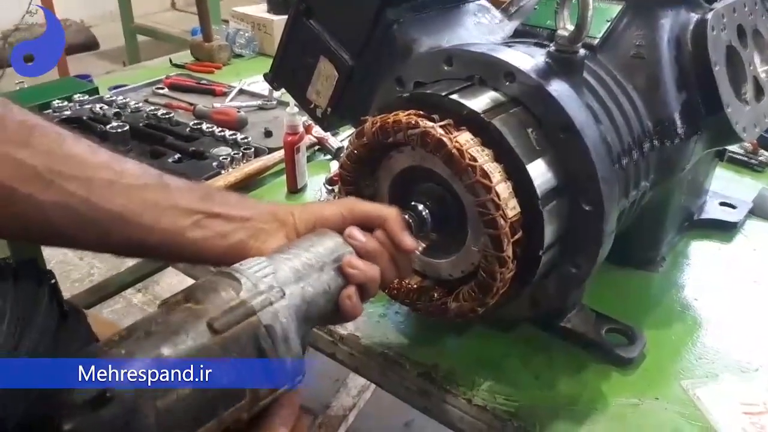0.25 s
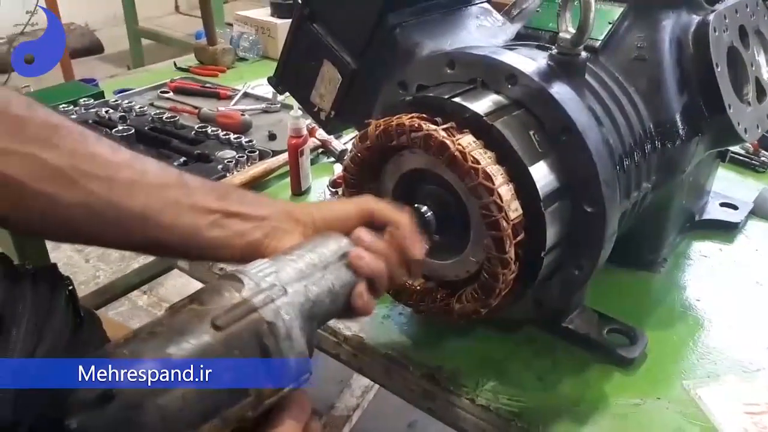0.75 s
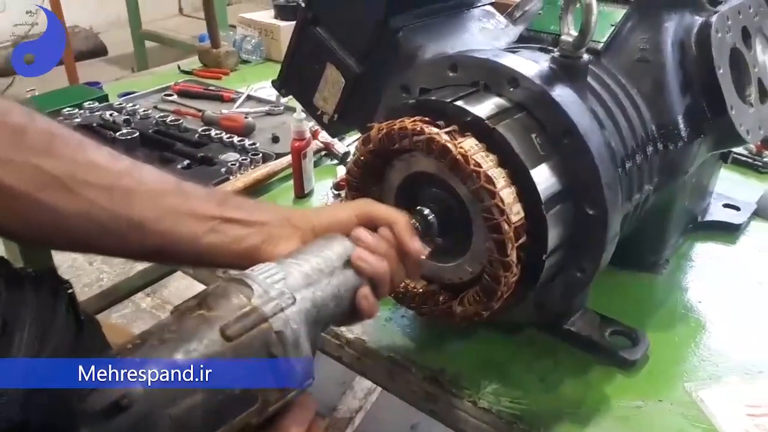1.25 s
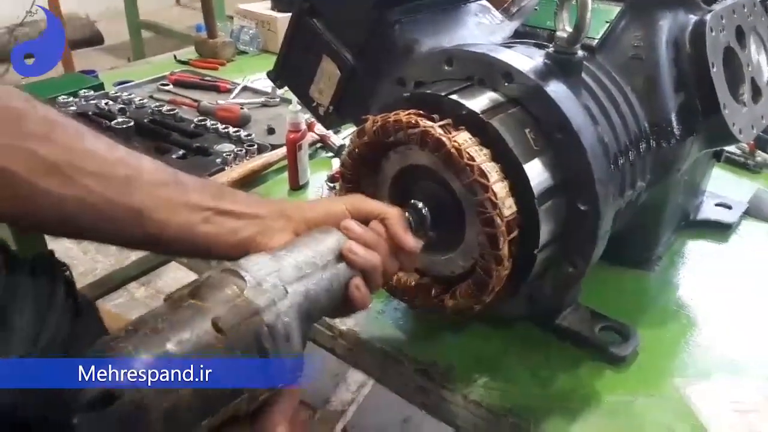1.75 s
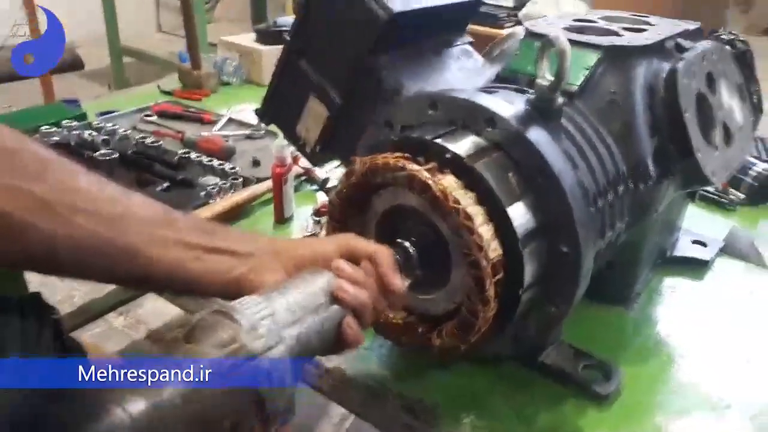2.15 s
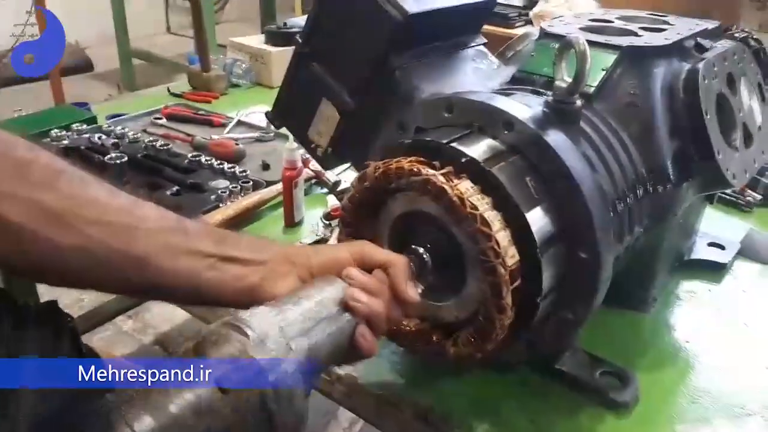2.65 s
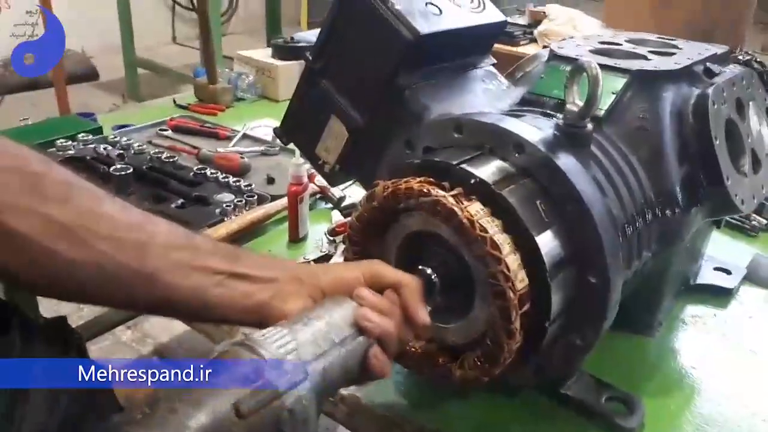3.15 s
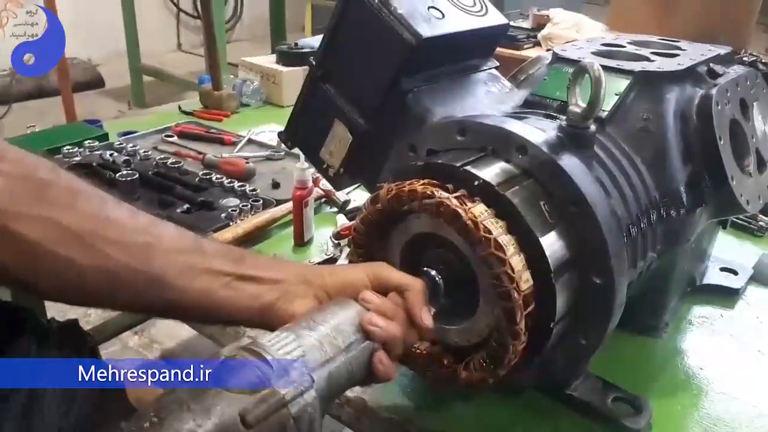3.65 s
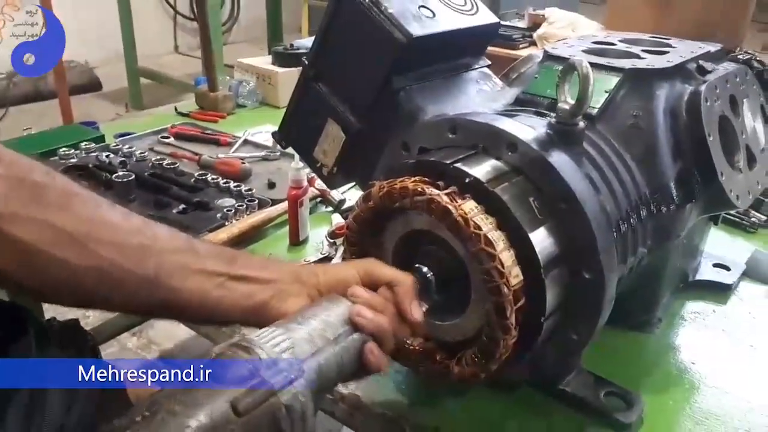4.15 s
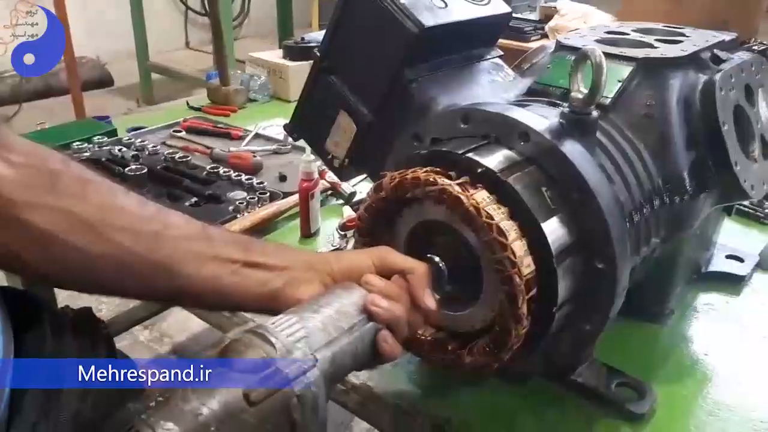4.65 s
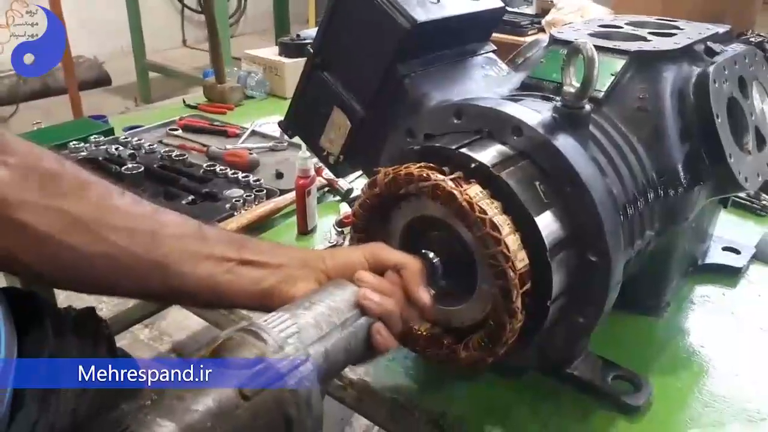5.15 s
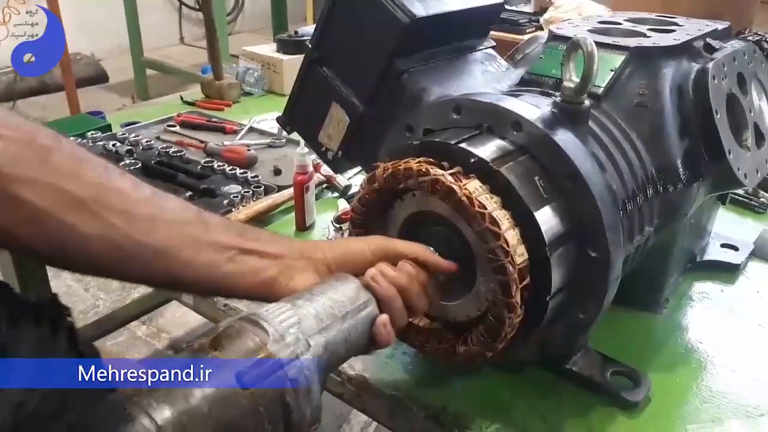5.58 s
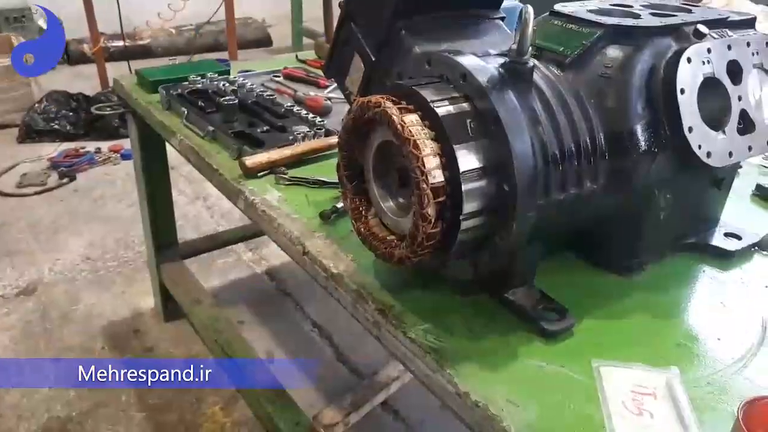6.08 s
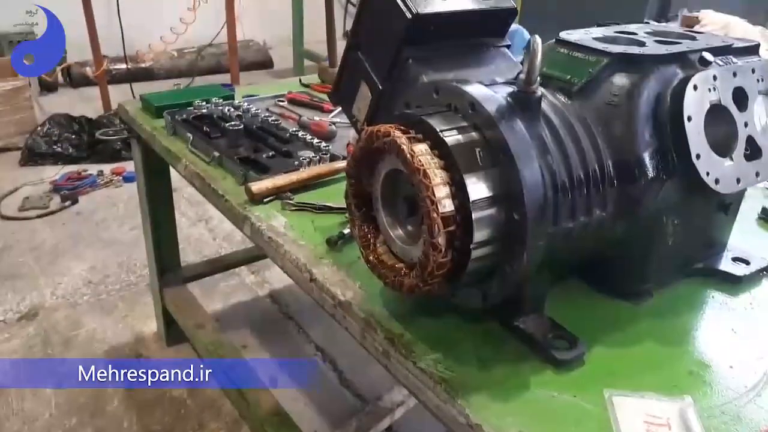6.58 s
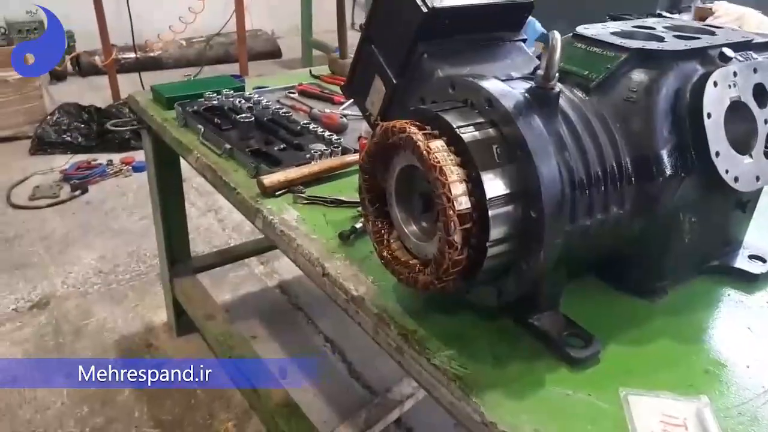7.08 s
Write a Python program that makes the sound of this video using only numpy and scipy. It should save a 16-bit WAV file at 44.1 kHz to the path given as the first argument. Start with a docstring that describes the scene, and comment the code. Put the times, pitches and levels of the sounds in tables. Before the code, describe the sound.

Loud, dry, slightly overloaded hammering of steel on steel: a long burst, then four shorter ones, each speeding up, rattling evenly, then stumbling into single clanks as the motor coasts down. Short workshop reverberation and a weak hum surround it. Then a hard cut to another microphone spot: a steady low compressor drone nearby on the right, handling thumps, a faint brief swish and a small metal tool clinking.

```python
"""An electric impact wrench tightens a bolt in five bursts: a train of noise cracks, rattling pings and thuds,
up to some forty blows a second, over a filtered-noise whirr of gears, with a short workshop reverberation.
Across the workshop a compressor drones: coloured noise with wavering pump harmonics.
After a cut to a second microphone position the wrench is gone and the drone is near, on the right;
the microphone is bumped, small tools clink on the bench and a short swish passes."""
import sys
import numpy as np
from scipy import signal
from scipy.fft import rfft, irfft, next_fast_len
from scipy.io import wavfile
from scipy.ndimage import map_coordinates

SR = 44100
rng = np.random.default_rng(int(sys.argv[2]) if len(sys.argv) > 2 else 0)


def put_to_file(sound):
    """Save the sound as 16-bit audio at rate SR, in the file named by the first command-line argument."""
    columns = np.atleast_2d(sound).T  # one column per channel
    safe = np.clip(columns, -1, 1)
    whole_steps = np.round(safe * 32767)
    wavfile.write(sys.argv[1], SR, whole_steps.astype(np.int16))


N = 322802
T = np.arange(N) / SR
CUT_S = 5.71  # cut from the wrench position to the second microphone position

# Colour of steel on steel: hz, level_db (relative, per Hz)
STRIKE_COLOUR = [(200, -8), (500, -18), (1200, 11), (2500, 14), (5000, 12.5), (9000, 10), (13000, 1.5),
                 (16000, -5.5)]
# Sharp ticks of the socket: hz, level_db (relative, per Hz)
TICK_COLOUR = [(5000, -52), (8000, -4), (11000, -3.5), (16000, 1)]
# Whirr of the gears: hz, level_db (relative, per Hz)
GEAR_COLOUR = [(200, -47), (600, -18.5), (1500, -1.5), (3000, 5), (6000, -2.5), (10000, -1.5),
               (16000, -19.5)]
# Housing tones, high then low: centre_hz, width_hz
HOUSING_TONES = [(4980, 1400), (1643, 100)]
# Trigger pulls, and how the hand damps and aims the tool: on_s, off_s, then relative levels
# whirr_db, high_tone_db, low_tone_db, left_right_db, bench_knock_db, jolt_db
TRIGGER_PULLS = [(0, 0.036, -30, -2, -13, 0, 19, 41.5), (0.19, 1.31, -27, -5, -14, 1, 23, 39.5),
                 (1.755, 2.223, -28.5, -1.5, -14, 2, 24, 41.5), (2.651, 3.258, -30, -48, -7.5, 4, 19, 41),
                 (3.807, 4.414, -31.5, -18, -6, 2.5, 21.5, 41.5),
                 (4.899, 5.492, -25, -11.5, -16.5, 2, 21.5, 41)]
# Time constants of the motor: run_up_s, coast_down_s
MOTOR_SPIN = (0.011, 0.073)


def wrench():
    """Blows excite noise bursts, loose pings and bench thuds; motor speed and cam scrapes drive gear noise."""
    s, blow_db, thud_db = contacts().T
    s = np.round(s * SR) / SR
    on, off, *grip = np.transpose(TRIGGER_PULLS)
    middle = (on + off) / 2
    whirr_db, high_db, low_db, pan_db, knock_db, jolt_db = (np.interp(T, middle, c) for c in grip)
    spin = motor_spin(on, off)
    whirr = amp(whirr_db) * spin

    crack = dying(s, amp(blow_db - 1), 0.015, 0.00049)
    clang = dying(s, amp(blow_db - 5.5), 0.024, 0.0015)
    second_lug = dying(s + 0.0029, amp(blow_db - 11), 0.013, 0.002)  # lands a moment later
    steel = (crack + clang + second_lug) * noise(STRIKE_COLOUR, [(300, 0.047)])

    loose = chatter(s, blow_db, within=0.004, t60=0.02, rise=0.001)
    ticks = (crack + loose) * amp(3.5) * noise(TICK_COLOUR, [(300, 0.13)])
    pings = rattle(s, blow_db - 14.5, within=0.022, detune=0.18, count=20)
    at = np.round(s * SR).astype(int)
    bench_thuds = thuds(s, blow_db + knock_db[at], thud_db + jolt_db[at], thud_db + 30.0)

    # the hammer scrapes up its cam before the next blow
    climb = spin * dying(s + 0.0174, amp(blow_db - 8), 0.022, 0.0018)
    gears = (whirr + climb) * noise(GEAR_COLOUR, [(300, 0)])
    high, low = (unit(filtered(rng.standard_normal((2, N)), resonant([(hz, width_hz, 0)])))
                 for hz, width_hz in HOUSING_TONES)
    housing = (clang + 2 * whirr) * amp(high_db + [[-4], [3]]) * high  # stronger on the right
    housing = housing + (0.33 * clang + 2.7 * whirr) * amp(low_db) * low
    return panned(steel + ticks + pings + bench_thuds + gears + housing, pan_db)


def motor_spin(on, off):
    """The motor swells exponentially up to each pull and coasts down exponentially after it."""
    run_up_s, coast_s = MOTOR_SPIN
    spin = 0
    for a, b in zip(on, off):
        run_up = np.exp(-np.abs(a - T) / run_up_s)
        coast = np.exp(-np.clip(T - b, 0, None) / coast_s)
        spin = spin + np.where(T < a, run_up, coast)
    return spin


# Hammer speed through each burst, one list a burst: time_s, blows_per_s
BURSTS = [
    [(.1979, 27.09), (.313, 35.55), (.44, 39.49), (.76, 39.81), (.96, 40.28), (1.139, 39.82),
     (1.222, 30.64), (1.3392, 19.96)],
    [(1.7342, 23.68), (1.812, 31.58), (1.975, 39.91), (2.059, 36.67), (2.21, 23.68), (2.2785, 14.56)],
    [(2.6765, 24.97), (2.76, 32.46), (2.857, 38.83), (3.088, 39.46), (3.143, 28.72), (3.274, 21.98)],
    [(3.8198, 24.96), (3.892, 33.83), (4.06, 39.39), (4.225, 37.21), (4.237, 26.87), (4.3543, 26.53)],
    [(4.9119, 24.22), (5.004, 34.72), (5.18, 39.26), (5.289, 37.64), (5.343, 29.29), (5.458, 20.51)],
]
# What the speed does to each cycle: blows_per_s, blow_db, thud_db, catch_lead_s, catch_db, rebound_db
CYCLE_BY_SPEED = [(17.96, -9.5, -32, .0142, -7, -24), (27.06, -7.5, -20, .0112, -10, -18),
                  (33.03, -7, -20.5, .0095, -10.5, -42), (39.96, -6, -17, .006, -16.5, -34)]
# Scatter from cycle to cycle: blow_db, thud_db, catch_db, rebound_db
CYCLE_SCATTER = (0.92, 4.2, 3.1, 5.2)
# Single contacts as the hammer creeps round before and after a burst: start_s, clang_db, thud_db
CREEP_CONTACTS = [(.01, -9.5, -32), (0.0266, -9, -15.5), (0.045, -21, -40), (0.0638, -16.5, -44),
                  (0.1177, -9.5, -17.5), (.126, -18, -39), (0.1475, -10, -39), (.1606, -15.5, -35),
                  (0.1832, -9, -30), (1.374, -8, -24), (1.3887, -8.5, -27), (1.413, -11, -43),
                  (1.4448, -7, -25), (1.461, -10.5, -34), (1.485, -14, -45), (1.7165, -10.5, -27),
                  (2.301, -16.5, -38), (2.343, -8, -20), (2.3619, -11, -38), (2.39, -18.5, -28),
                  (2.455, -19, -34), (2.4657, -10.5, -39), (2.508, -14, -44), (2.646, -27, -47),
                  (2.6646, -23, -22), (3.317, -9, -35), (3.332, -10, -22), (3.3453, -8.5, -43),
                  (3.41, -7.5, -39), (3.434, -11.5, -43), (3.743, -28, -45), (3.767, -20.5, -38),
                  (3.7907, -19.5, -44), (4.3672, -14, -33), (4.3898, -6.5, -17.5), (4.406, -10, -37),
                  (4.423, -13, -46), (4.4722, -7, -23), (4.4931, -7.5, -42), (4.534, -24, -36),
                  (4.572, -18, -47), (4.589, -10, -40), (4.627, -13, -37), (4.8736, -27, -39),
                  (5.4693, -13, -43), (5.499, -15, -40), (5.515, -11, -50), (5.5331, -12.5, -40),
                  (5.5877, -5.5, -19), (5.61, -10.5, -31)]
REBOUND_S, JITTER_S = .013, .0006  # rebound after its blow; timing scatter of each blow
SOFT_THUD_DB = -20  # thud of a catch or rebound, under its own clang


def contacts():
    """Once a cycle the hammer catches the anvil, strikes and rebounds; the catch before a burst's first blow is
    among the single contacts."""
    rows = [np.array(CREEP_CONTACTS)]
    speeds, *laws = np.transpose(CYCLE_BY_SPEED)
    for burst in BURSTS:
        knots, rates = np.transpose(burst)
        t = np.arange(knots[0], knots[-1], 1 / SR)
        cycles = np.cumsum(np.interp(t, knots, rates)) / SR
        s = np.interp(np.arange(int(cycles[-1]) + 1), cycles, t)  # one blow at each whole cycle
        speed = np.interp(s, knots, rates)
        blow_db, thud_db, lead, catch_db, rebound_db = (np.interp(speed, speeds, c) for c in laws)
        jitter, *draw = rng.standard_normal((len(s), 5)).T
        scatter = np.array(CYCLE_SCATTER)[:, None] * np.clip(draw, -2, 1.5)
        levels = np.array([blow_db, thud_db, catch_db, rebound_db]) + scatter
        blow_db, thud_db, catch_db, rebound_db = levels
        s = s + JITTER_S * jitter
        blows = np.transpose([s, blow_db, thud_db])
        catches = np.transpose([s - lead, catch_db, catch_db + SOFT_THUD_DB])[1:]
        rebounds = np.transpose([s + REBOUND_S, rebound_db, rebound_db + SOFT_THUD_DB])
        rows += [blows, catches, rebounds]
    return np.vstack(rows)


def chatter(s, db, within, t60, rise):
    """The loose socket strikes three more times soon after each contact."""
    draw = rng.random((len(s), 2, 3))
    times = s[:, None] + 0.0013 + within * draw[:, 0]
    return dying(times, amp(db[:, None] - 40.5 * draw[:, 1]), t60, rise)


# Ringing of anvil, socket and bolt: mode_hz (before detuning), level_db (relative), t60_s
STEEL_MODES = [(1255, 0.5, 0.012), (1637, 2.5, 0.0096), (2520, 8, 0.0081), (2890, 9, 0.0078),
               (4300, 8, 0.0094), (5000, 8, 0.0029), (7180, 7, 0.006), (12920, 12.5, 0.018)]


def rattle(s, db, within, detune, count):
    """Loose steel pings after each contact: short decaying sines near the modes, drawn anew for each side."""
    t, out = T[:260], []
    starts, base_db = np.repeat(s, count)[:, None], np.repeat(db, count)[:, None]
    for draw in rng.random((2, len(s), count, 4)):
        mode = (draw[..., 0] * len(STEEL_MODES)).astype(int)
        hz, mode_db, t60 = np.array(STEEL_MODES)[mode].reshape(-1, 3).T[..., None]
        lag, pitch, size = (draw[..., k].reshape(-1, 1) for k in (1, 2, 3))
        late_db = (8 + 6 * (hz > 9000)) * lag  # late pings are weaker, the highest most of all
        level_db = base_db + mode_db - 3.9 * np.log(size + 0.038) - late_db
        ping_hz = hz * (1 + detune * (2 * pitch - 1))
        pings = amp(level_db - 60 * t / t60) * np.sin(2 * np.pi * ping_hz * t)
        out.append(train(starts + np.round(within * lag * SR) / SR + t, pings))
    return np.array(out)


# Knocks through the bench: centre_hz, width_hz, level_db (relative)
BENCH_KNOCKS = [(318, 960, 7.5), (810, 2860, 7)]
# The machine jolts forward: centre_hz, width_hz, level_db (relative)
FORWARD_JOLT = [(110, 142, 0.012)]
# The machine jolts sideways: centre_hz, width_hz, level_db (relative)
SIDEWAYS_JOLT = [(333, 450, 0)]


def thuds(s, knock_db, jolt_db, shake_db):
    """A push a moment late on each side, a shake of opposite sign, and stray knocks of either sign."""
    draw = rng.random((2, len(s), 3, 2))
    push = [train(s + 0.00374 * side[:, 2, 0], amp(jolt_db)) for side in draw]
    shake = train(s, amp(shake_db)) * [[-1], [1]]
    knocks = []
    for side in draw:
        times = s[:, None] + 0.00691 * side[:, :2, 0]
        signed = 2 * side[:, :2, 1] - 1
        knocks.append(train(times, amp(knock_db)[:, None] * signed))
    pushed = filtered(np.array(push), resonant(FORWARD_JOLT))
    shaken = filtered(shake, resonant(SIDEWAYS_JOLT))
    return pushed + shaken + filtered(np.array(knocks), resonant(BENCH_KNOCKS))


# Reverberation of the workshop: hz, t60_s
SHOP_DECAY = [(150, 0.19), (2000, 0.58), (6000, 0.46), (14000, 0.2)]


def shop(x):
    """Noise whose bands each die at their own speed answers the sound, as the workshop does."""
    hz, t, z = signal.stft(rng.standard_normal((2, SR // 2)), SR, nperseg=256)
    fade = amp(-60 * t / along(SHOP_DECAY, hz)[:, None])
    tail = signal.istft(z * fade, SR, nperseg=256)[1]
    return signal.fftconvolve(x, tail / np.linalg.norm(tail[0]), axes=1)[:, :N]


# Handling of the microphone: start_s, level_db (relative)
MIC_BUMPS = [(5.713, 4.5), (5.727, 3), (7.252, 5), (7.283, 2.5)]
# Small tools on the bench: start_s, level_db (relative)
TOOL_CLINKS = [(6.6278, -22), (7.2382, -21)]
# Ringing of a small tool: mode_hz, level_db (relative), t60_s
TOOL_MODES = [(3490, 4.5, 0.074), (4620, -10, .04), (5700, -5, .14), (6600, -10, 0.11), (7460, -9, 0.12),
              (7440, -5, 0.16), (9851, -1, .04), (10900, -12, .08)]
# A short high swish: centre_s, half_length_s, level_db (relative)
HIGH_SWISH = (6.745, .025, -39)


def bench():
    """Low noise bumps, noise ticks with one ringing clink, and a swelling noise swish, all to the right."""
    s, db = np.transpose(MIC_BUMPS)
    bump_colour = [(45, -26), (90, 16), (250, 9), (600, -1.5), (2000, -47)]
    bumps = dying(s, amp(db - 9), 0.091, 0.0056) * noise(bump_colour, [(40, 0), (150, 0.29)])
    s, db = np.transpose(TOOL_CLINKS)
    tick_colour = [(1500, -40), (4000, 1), (15000, -7)]
    ticks = dying(s, amp(db - 8), 0.041, .0003) * noise(tick_colour, [(100, .2)])
    clinks = amp(-5) * ringing(TOOL_CLINKS[1:], TOOL_MODES, scatter_db=1)  # only the second contact rings
    s, half, db = HIGH_SWISH
    swish_colour = [(3000, -20), (9000, -8), (12000, 1), (15000, -10)]
    swish = amp(db) * np.exp(-((T - s) / half) ** 2) * noise(swish_colour, [(100, 0)])
    return panned(bumps + ticks + clinks + swish, -11)


# Loudness and place of the drone, far then near: time_s, level_db (relative), left_right_db (negative: right)
DRONE_PATH = [(0, -45.5, -23.5), (1.6, -33.5, -5.5), (2.6, -35, -5), (3.6, -35, -5), (4.75, -35, -5.5),
              (5.7, -35.5, -8), (5.712, -22.5, -8), (5.9, -21, -6.5), (6.9, -21, -7), (7.32, -21, -7.5)]
# Air noise from across the workshop: hz, level_db (relative, per Hz)
FAR_COLOUR = [(20, -34), (60, -8), (190, -10), (350, -5), (530, -14.5), (1200, -11.5), (3000, -18.5),
              (6000, -24.5), (16000, -41)]
# Air noise from close by: hz, level_db (relative, per Hz)
NEAR_COLOUR = [(20, -15), (60, -4), (160, -1.5), (350, -0.5), (560, -7.5), (910, -13), (1440, -7.5),
               (2280, -16.5), (4600, -27), (9000, -35), (16000, -41.5)]
# Left-right likeness of the air noise: hz, correlation
AIR_LIKENESS = [(50, -1.24), (130, 1), (290, 0.76), (640, 0.57), (1400, -0.29), (4000, -0.04)]
# Pump harmonics: multiple of PUMP_HZ, level_db (relative)
PUMP_ORDERS = [(2, -9.5), (3, -7.5), (4, -8.5), (6, -20), (7, -21.5)]
PUMP_HZ = 87.9


def compressor():
    """Flickering air noise plus pump harmonics that waver in level and phase; the colour differs far and near."""
    level_db, pan_db = curves(DRONE_PATH)
    far = T < CUT_S
    air = np.where(far, noise(FAR_COLOUR, AIR_LIKENESS), noise(NEAR_COLOUR, AIR_LIKENESS))
    phase = 2 * np.pi * PUMP_HZ * T
    pump = sum(amp(db + 2.5 * wobble(9)) * np.sin(k * phase + .45 * wobble(7)) for k, db in PUMP_ORDERS)
    drone = amp(0.72 * wobble(16)) * air + amp(np.where(far, -3, 1)) * pump
    return panned(amp(level_db) * drone, pan_db)


def amp(db):
    """Decibels to an amplitude factor."""
    return 10 ** (np.asarray(db) / 20)


def unit(x):
    """Scale to rms 1."""
    return x / np.sqrt(np.mean(x ** 2) + 1e-20)


def along(points, hz):
    """Interpolate (hz, value) points on a log frequency axis."""
    f, v = np.transpose(points)
    return np.interp(np.log(hz + 1), np.log(f + 1), v)


def curves(rows):
    """One value per sample for each column after the time."""
    s, *cols = np.transpose(rows)
    return [np.interp(T, s, c) for c in cols]


def wobble(rate):
    """A smooth random curve, rate knots a second."""
    return map_coordinates(rng.standard_normal(int(N * rate / SR) + 4), [T * rate])


def filtered(x, response):
    """Multiply the spectrum of x by a response of frequency."""
    m = next_fast_len(N + SR // 2)
    return irfft(rfft(x, m) * response(np.fft.rfftfreq(m, 1 / SR)), m)[..., :N]


def resonant(modes):
    """Causal response of a few resonances of alternating sign."""
    def one(f, centre, width, db):
        return amp(db) * 1j * f * width / (centre * centre - f * f + 1j * f * width)
    return lambda f: sum((-1) ** k * one(f, *mode) for k, mode in enumerate(modes))


def noise(spectrum, alike):
    """Stereo noise of rms 1: the mix of mid and side sets how alike left and right are at each frequency."""
    def response(hz):
        turn = np.arccos(np.clip(along(alike, hz), -1, 1)) / 2
        return amp(along(spectrum, hz)) * [np.cos(turn), np.sin(turn)]
    mid, side = filtered(rng.standard_normal((2, N)), response)
    return unit(np.array([mid + side, mid - side]))


def panned(x, pan_db):
    """Set the left side pan_db above the right."""
    return x * amp(np.array([[.5], [-.5]]) * pan_db)


def train(times, gains):
    """Impulses at the given times."""
    return np.bincount(np.round(np.ravel(times) * SR).astype(int), np.ravel(gains), N)[:N]


def dying(times, gains, t60, rise):
    """Envelope: a quick rise and an exponential fall from each time."""
    t = T[:SR // 4]
    shape = amp(-60 * t / t60) * (1 - np.exp(-t / rise))
    return np.abs(signal.fftconvolve(train(times, gains), shape)[:N])


def ringing(events, modes, scatter_db):
    """Every contact rings the modes at new strengths and phases on each side."""
    hz, db, t60 = np.transpose(modes)[:, :, None]
    t, out = T[:SR // 12], np.zeros((2, N + SR))
    partials = amp(db - 60 * t / t60) * np.exp(2j * np.pi * hz * t)
    for s, level_db in events:
        draw = rng.standard_normal((3, 2, len(modes)))
        phase = np.arctan2(draw[1], draw[2])
        weight = amp(level_db + scatter_db * draw[0]) * np.exp(1j * phase)
        out[:, round(s * SR):][:, :len(t)] += (weight @ partials).imag
    return out[:, :N]


def scene():
    """The wrench and its reverberation up to the cut, with the compressor and the bench."""
    tool = wrench()
    return (tool + amp(-12.0) * shop(tool)) * (T < CUT_S) + compressor() + bench()


# Colour of the microphone ports: hz, left_db, right_db
MIC_PORTS = [(3720, -0.5, 0), (4140, 1, 2.5), (4900, -3.5, 3), (5700, -3.5, -6.5), (6920, -2, 0.5),
             (7820, -5, -2), (8920, -23.5, -13), (9500, -19.5, -12), (10340, -14.5, -13.5),
             (12140, -5.5, -3.5), (13400, -14, -11.5), (16000, -16, -10.5)]
SUB_HZ, TOP_HZ = 30, 15900  # corner of the bass cut; band limit


def record(dry):
    """Microphone ports colour the treble, deep bass is lost, peaks round off and the band limit cuts the top."""
    hz, left_db, right_db = np.transpose(MIC_PORTS)

    def microphone(f):
        bass_cut = (1j * f / (SUB_HZ + 1j * f)) ** 2
        return bass_cut * amp([along(np.transpose([hz, side]), f) for side in (left_db, right_db)])
    heard = filtered(dry, microphone)
    clipped = heard / (1 + np.abs(heard / 0.82) ** 5) ** (1 / 5)
    return filtered(clipped, lambda f: f < TOP_HZ)


dry = scene()
out = record(dry)
put_to_file(out)
```